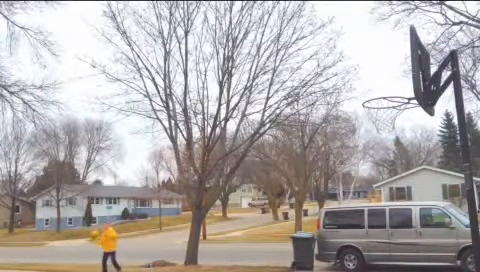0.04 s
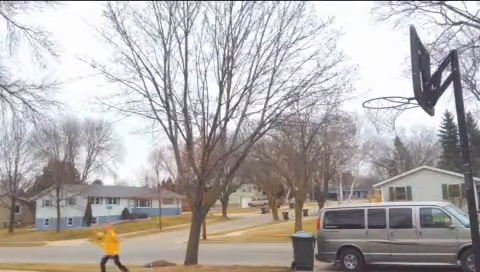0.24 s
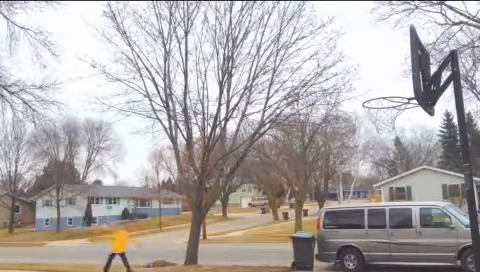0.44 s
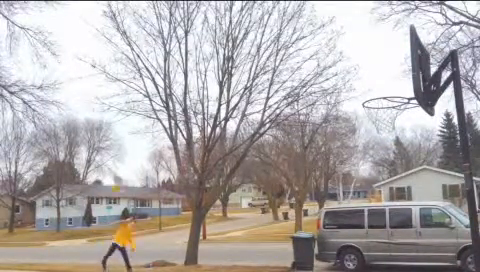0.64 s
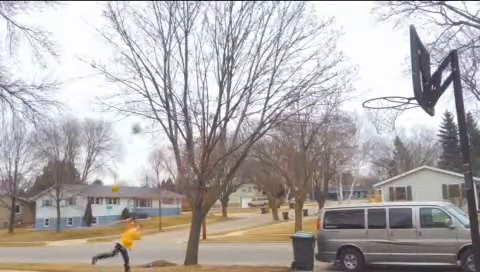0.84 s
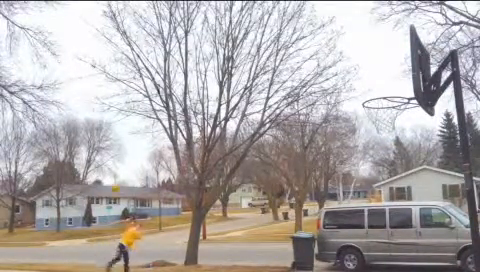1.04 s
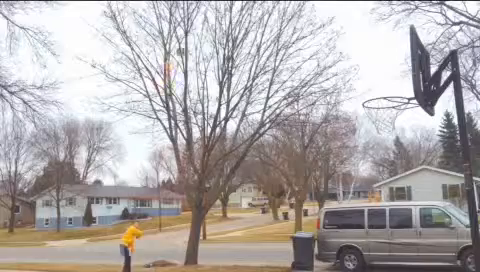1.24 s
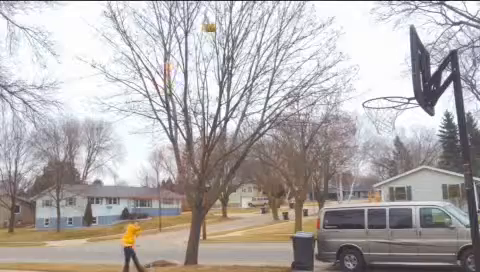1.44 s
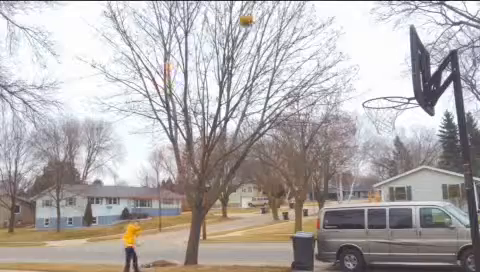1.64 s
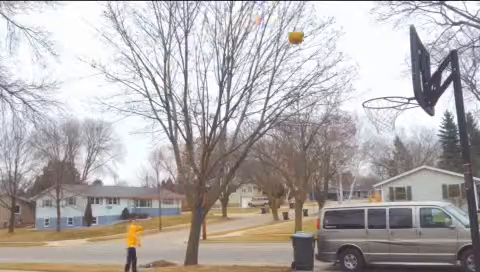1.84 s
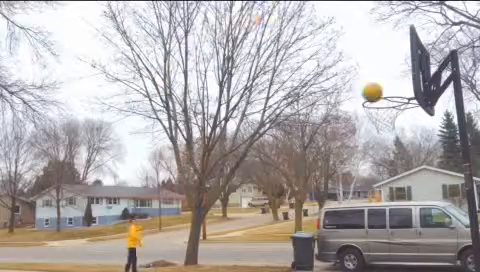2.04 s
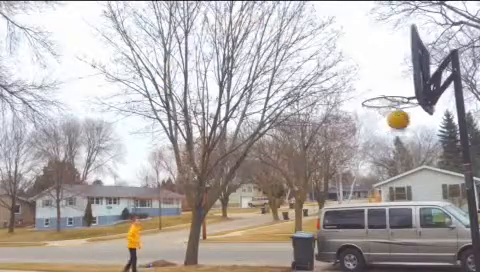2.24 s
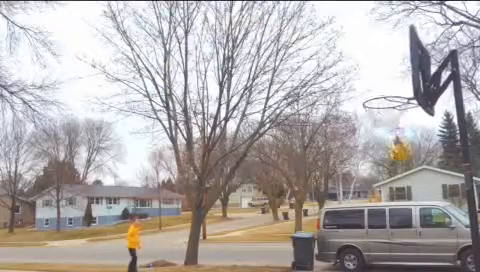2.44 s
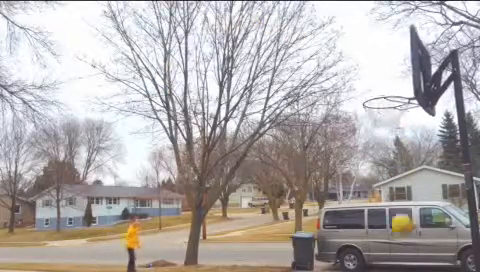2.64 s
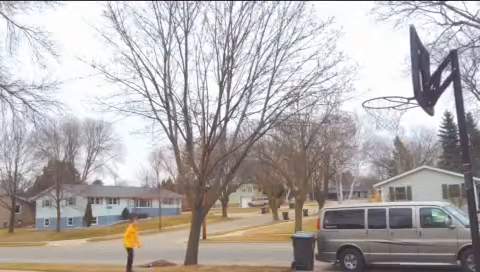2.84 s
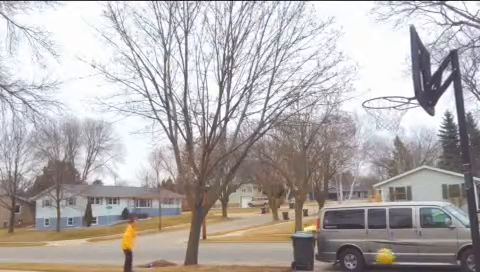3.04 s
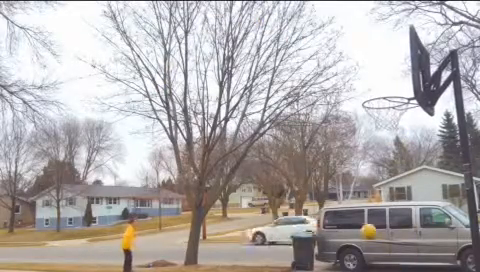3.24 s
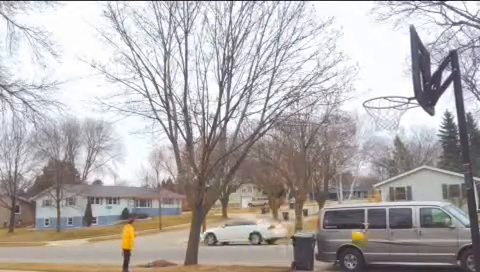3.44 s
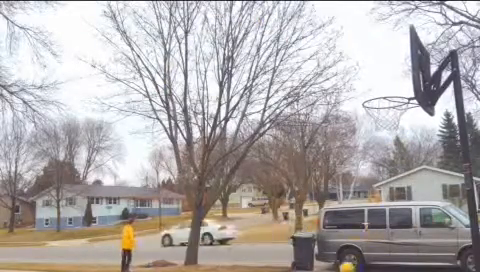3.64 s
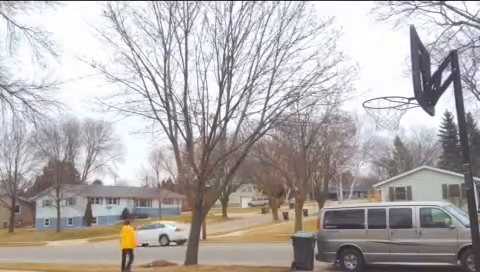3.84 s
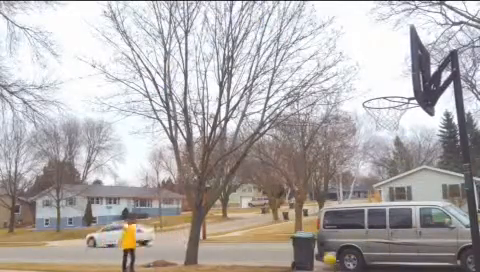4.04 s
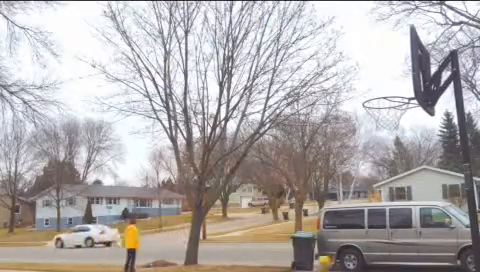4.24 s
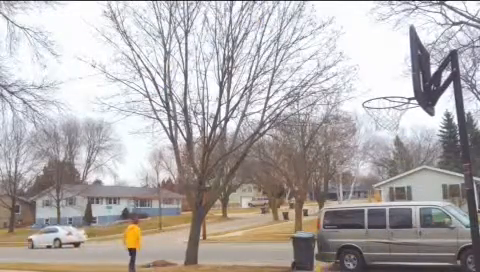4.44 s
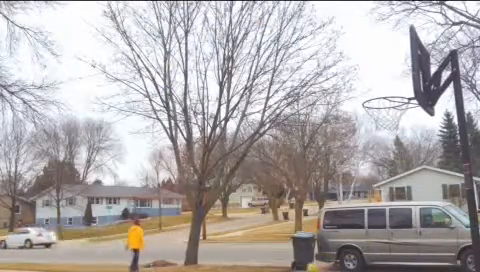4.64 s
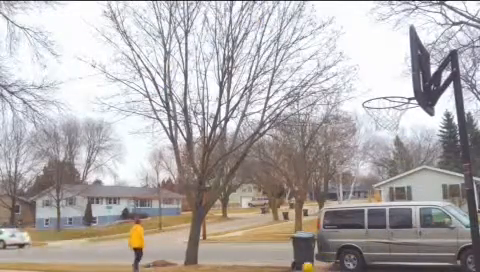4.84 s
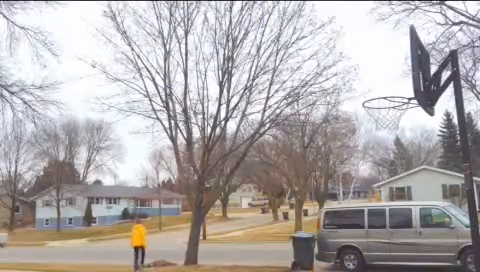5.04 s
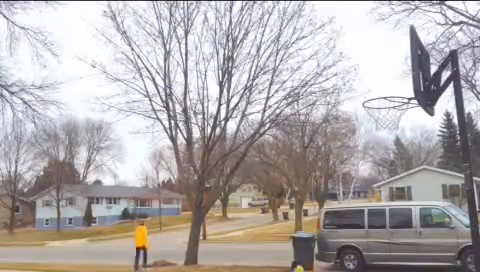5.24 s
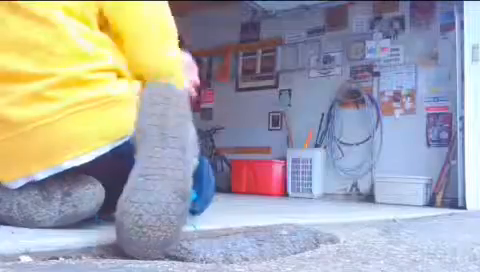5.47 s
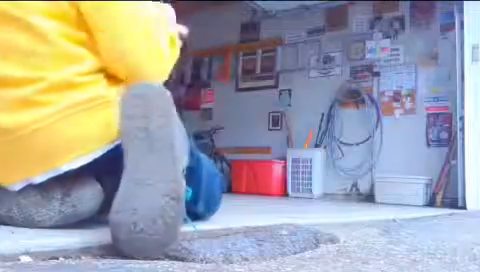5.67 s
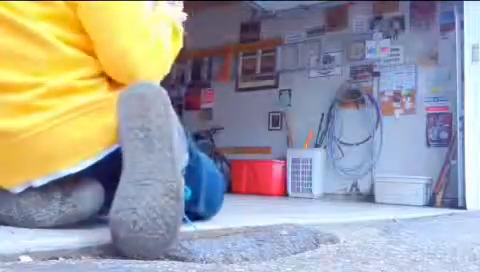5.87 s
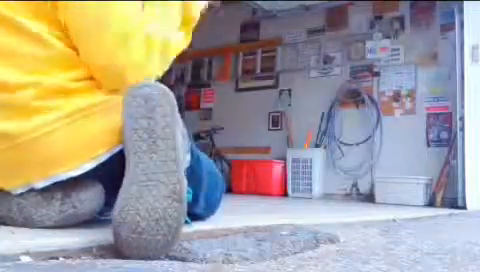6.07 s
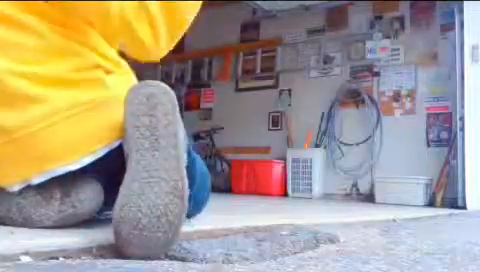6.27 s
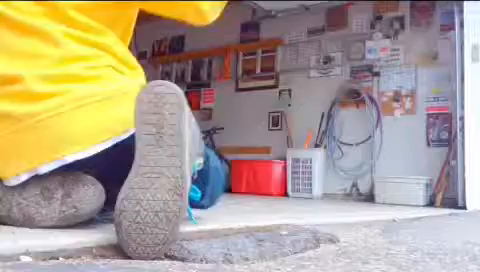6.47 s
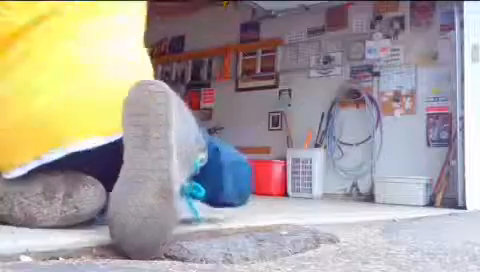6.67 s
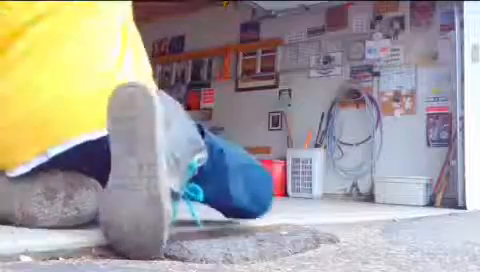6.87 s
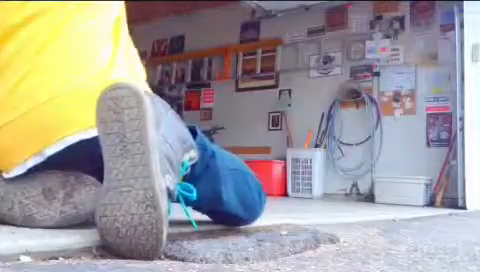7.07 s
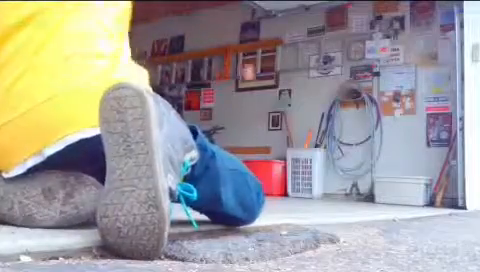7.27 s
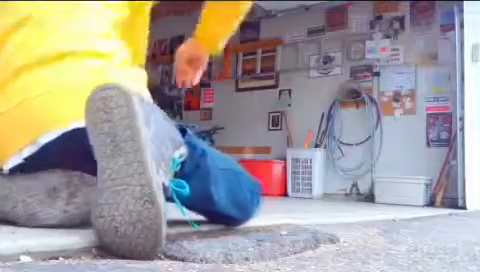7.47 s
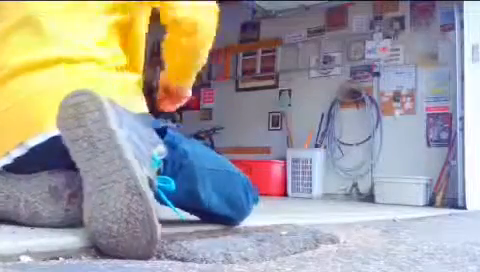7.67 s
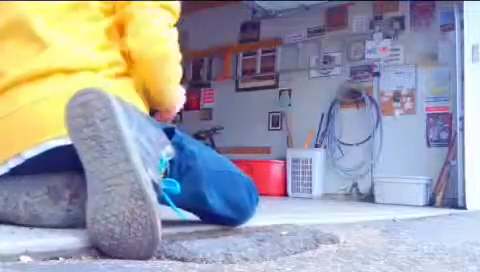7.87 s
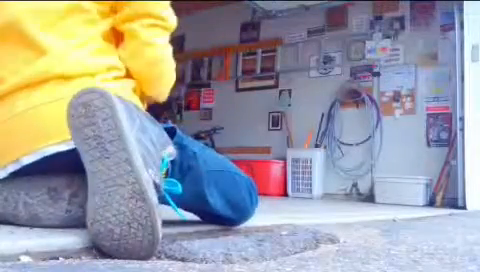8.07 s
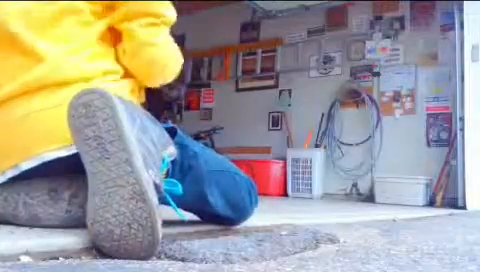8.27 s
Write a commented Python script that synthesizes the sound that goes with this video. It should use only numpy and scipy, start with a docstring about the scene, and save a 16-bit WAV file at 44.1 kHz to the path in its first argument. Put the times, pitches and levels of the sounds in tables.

```python
"""Tyres roar and hiss as a car passes, over a faint early thump and a bird chirp on the street. A basketball
whips through the net, tugs at the rim and bounces away: slap, grit and a ringing shell. Then the scene changes
to the quiet mouth of a garage: far hush, rustling clothes, birds, a soft low tone. A heavy blow, most likely
the ball on the overhead door, sets the panels booming and rattling. Shaped noise makes the rough sounds,
decaying modes the ringing ones, gliding tones the birds."""
import sys
import numpy as np
from scipy import signal
from scipy.fft import rfft, irfft
from scipy.io import wavfile
from scipy.ndimage import uniform_filter1d, minimum_filter1d

SR = 44100
rng = np.random.default_rng(int(sys.argv[2]) if len(sys.argv) > 2 else 0)


def transcribe(signal):
    """Save signal, clipped to [-1, 1], as a 16-bit WAV file at the path in sys.argv[1]."""
    frames = np.atleast_2d(signal).T
    limited = np.clip(frames, -1, 1)
    pcm = np.round(limited * 32767).astype(np.int16)
    wavfile.write(sys.argv[1], SR, pcm)


N = 366471
T = np.arange(N) / SR
GARAGE_START_S = 5.505

# Spectra give colour only, each player sets the loudness; table levels are before the players' trims.
# tyre roar: f/Hz, level/dB per Hz
ROAR_COLOUR = [(25, -58), (60, -34), (110, -16), (170, -2), (240, 1), (400, -2), (700, -1), (950, -0.5),
               (1250, -2), (1800, -1), (2500, -8), (3500, -18), (5000, -26), (9000, -59)]
# tyre hiss: f/Hz, level/dB per Hz
HISS_COLOUR = [(1200, -18), (2500, 9), (4000, 2), (5200, 1.5), (6800, 0), (8500, -4), (11000, -10),
               (15500, -15.5)]
# tyre noise swells where houses and the parked van leave the view open:
# t/s, half width/s, roar level/dB, hiss level/dB, tread level/dB, roar brightness/dB per octave
TYRE_SWELLS = [(.1, 0.16, -58, -74, -50, 1.5), (1.38, 0.34, -44, -60.5, -67, 0.5),
               (1.9, 0.25, -44.5, -62.5, -70, 2.5), (3.6, 0.32, -38.5, -62.5, -45.5, -0.94),
               (4.25, 0.48, -41.5, -60, -46.5, -1), (5.2, 0.61, -44.5, -64.5, -46.5, 0)]
# the street between swells (dB)
STREET_ROAR_DB, STREET_HISS_DB, STREET_TREAD_DB = -44, -68.5, -57.5
# the car is nearest at this time; it takes so long to cover its nearest distance, coming and going (s)
NEAREST_S, COMING_S, GOING_S = 2.12, 0.95, 1.37
# lowest pitch that the echo off the road weakens when the car is nearest (Hz)
NOTCH_HZ = 2466

# a faint early thump, then the ball's landings on the driveway: # t/s, slap level/dB, thump level/dB, grit
# level/dB, delay of the echo off the van/s
DRIVEWAY_HITS = [(.1147, -48, -24, -37, .06), (2.9832, 0, 0, -7.5, 0.052), (3.913, -11, -6, -7, 0.038),
                 (4.6174, -26, -11.5, -16, 0.04), (5.172, -34, -13, -20, .029)]
# slap of the ball: f/Hz, level/dB per Hz
SLAP_COLOUR = [(30, -45), (110, -24), (300, 4), (1000, 1), (2000, 9), (3300, -5), (4500, -6), (5700, 5),
               (7800, -4), (9500, 1), (13000, -9.5), (15500, -28)]
# crunching grit: f/Hz, level/dB per Hz
GRIT_COLOUR = [(100, -28), (3500, 3), (4800, 13.5), (6400, 10.5), (8000, -3), (9300, -2), (11000, -30),
               (13500, -5), (15500, -32)]
# the ball's shell, then the air inside it: f/Hz, level/dB, t60/s
BALL_MODES = [(196, -20.5, 0.054), (720, -23.5, 0.053), (964, -31.5, 0.11), (1080, -29, .04),
              (1817, -37.5, 0.08), (2230, -31, 0.056), (2930, -36, 0.037)]
# echoes off the ground and the house fronts: delay/s, level/dB
GROUND_ECHOES = [(.0062, -21), (0.0206, -24), (.063, -28), (.096, -27.5)]

# bird notes: t/s, length/s, first f/Hz, last f/Hz, warble depth/Hz, level/dB
BIRD_NOTES = [(0.133, 0.048, 3135, 3060, 0, -60), (5.78, .042, 4140, 3300, 350, -62),
              (5.817, 0.041, 3200, 2760, 200, -59.5), (5.999, .014, 5200, 7960, 0, -59),
              (8.242, .068, 2400, 3120, 0, -77.5)]
WARBLE_HZ = 50
# a far bird repeats one note: first note (s), spacing (s), level (dB)
FAR_START_S, FAR_GAP_S, FAR_DB = 5.96, .117, -82.5

# the ball drags the net taut and the cords whip about: t/s, tug level/dB, snap level/dB, t60/s
NET_MOVES = [(2.2025, -33.5, -36.5, 0.057), (2.2154, -26.5, -35, 0.084), (2.2214, -34, -23, 0.045),
             (2.2304, -31, -32.5, .13), (2.2787, -37, -35.5, 0.17), (2.4098, -43, -39.5, .066),
             (2.445, -47, -46, 0.11), (2.5353, -54, -54.5, 0.34), (2.6185, -55, -48, 0.095),
             (2.8151, -58, -58, 0.12)]
# tug of the net: f/Hz, level/dB per Hz
TUG_COLOUR = [(60, -41), (170, -33), (290, 5.5), (520, 4), (820, 1), (1200, -1), (1700, -9), (2800, -18.5),
              (6000, -29.5)]
# snap of the cords: f/Hz, level/dB per Hz
SNAP_COLOUR = [(500, -22), (2000, -1), (3500, -7), (5000, -3), (6700, 4), (8500, -3.5), (11500, -6.5),
               (15500, -14)]
# the rim under the tug: f/Hz, level/dB, t60/s
RIM_MODES = [(275, -12.5, 0.37), (402, -3.5, 0.066), (810, 2, 0.071), (1493, -11, 0.077),
             (3280, -18, 0.076), (4630, -13, .045), (6600, -12, 0.066)]
# the steel loops that hold the net clink with each snap: f/Hz, level/dB, t60/s
LOOP_MODES = [(4800, 0, 0.032), (5103, -19, 0.096), (6013, -11, 0.058), (8172, 0, 0.03), (8446, -5, 0.038)]

# hush of far traffic: f/Hz, level/dB per Hz
HUSH_COLOUR = [(25, -54), (60, -26), (100, -14.5), (150, -4), (210, -6.5), (265, -4.5), (330, -6),
               (600, -8), (820, -5.5), (1150, -12.5), (1700, -23.5), (2600, -32.5), (9000, -33.5),
               (15500, -35.5)]
HUSH_DB = -57.5
# rubbing cloth: f/Hz, level/dB per Hz
CLOTH_COLOUR = [(600, -26), (2000, -1.5), (4200, -11), (7000, -3), (9000, 0.5), (12000, -6), (15500, -12)]
# strokes of sleeve and trouser leg: t/s, time to fall by 8.7 dB either side/s, level/dB
CLOTH_STROKES = [(5.52, 0.4, -72), (5.765, 0.1, -64), (6.18, 0.1, -61), (6.335, 0.1, -66.5),
                 (6.78, .085, -60.5), (7.17, .08, -70.5), (7.6, .075, -54.5)]
RUSTLE_FLOOR_DB = -78.5  # clothes never rest entirely
# a soft low tone sinks in three pulses: t/s, length/s, first f/Hz, last f/Hz, level/dB
LOW_PULSES = [(7.118, .028, 305, 268, -50.5), (7.148, .045, 265, 245, -52.5), (7.196, .04, 240, 230, -56)]

# separate blows on the door: t/s, boom level/dB, knock level/dB, clatter level/dB, knock and clatter t60/s
DOOR_BLOWS = [(7.621, -46, -52, -32.5, 0.11), (7.6453, -29, -38.5, -27.5, 0.11),
              (7.663, -26, -9.5, -14, 0.026), (7.732, -29, -12, -41, 0.053), (7.8047, -32, -27, -39.5, .15),
              (7.8547, -55, -37.5, -40.5, 0.31), (7.9492, -55, -55, -49, 0.4), (8.166, -65, -50, -70, .071)]
# boom of the door: f/Hz, level/dB per Hz
BOOM_COLOUR = [(25, -48), (80, -28), (115, -16), (160, 1.5), (320, 2), (480, -0.5), (750, -11),
               (1100, -18.5), (1800, -23), (2800, -36), (6000, -42.5)]
# knock on the door: f/Hz, level/dB per Hz
KNOCK_COLOUR = [(100, -37), (400, -0.5), (750, 5), (1300, -2.5), (1800, -10), (2600, -16), (3300, -22),
                (5000, -26.5), (10000, -47)]
# crack and clatter of the steel: f/Hz, level/dB per Hz
STEEL_COLOUR = [(400, -18), (1500, 0), (2700, 0), (3400, 1), (4600, 1), (6000, -0.5), (8000, 6),
                (10500, -1), (15500, -13.5)]
# steel hinges and rollers: f/Hz, level/dB, t60/s
HINGE_MODES = [(3430, -9, 0.1), (4490, -2, .04), (4770, -11, 0.055), (7780, -6, .06), (9300, -15, .1)]
# the panels ring on after the main blow: f/Hz, level/dB, t60/s
PANEL_MODES = [(143.7, -12, 0.45), (193.7, 2.5, 0.53), (224, 0, 0.53), (254, 5, 0.48), (281.7, 6, 0.49),
               (312.4, 4.5, 0.4), (355.7, 4, 0.44), (404, -3.5, 0.46), (448, -3, 0.46), (478, -12, .5),
               (560, -2.5, 0.52), (608, -12, 0.32), (728, -17, 0.35), (820, -13, 0.47), (920, -13, .45),
               (957, -16, 0.37), (1770, -16, 0.37)]
MAIN_BLOW_S = 7.66  # the ball lands its full weight on the door
# from the main blow on, the door shudders in its tracks: spacing (s), knock and clatter of each blow (t60 s)
SHUDDER_GAP_S, SHUDDER_T60 = .02, .46
# boom, knock and clatter of the main blow and its rebounds, one row each: first level/dB, fall/dB per s
SHUDDER_LEVELS = [(-15, 102), (-28, 9), (-36, 152)]
# dull settling bumps: f/Hz, level/dB per Hz
BUMP_COLOUR = [(40, -40), (150, -11), (260, 2.5), (380, -6), (700, -11.5), (3000, -42)]
# the door settles: first bump (s), spacing (s), level (dB), fall (dB per s)
BUMP_START_S, BUMP_GAP_S, BUMP_DB, BUMP_FALL_DB_PER_S = 8.063, .02, -38.5, 84


def amp(db):
    """Turns dB into an amplitude factor."""
    return 10 ** (np.asarray(db) / 20)


def evened(x):
    """Scales to rms 1."""
    return x / np.sqrt(np.mean(x ** 2) + 1e-20)


def read(points, hz):
    """A spectrum's dB at the given frequencies, drawn straight over log frequency."""
    f, value = np.transpose(points)
    return np.interp(np.log(hz + 1), np.log(f + 1), value)


def add(mix, s, sound):
    """Mixes a sound in at time s."""
    part = mix[max(round(s * SR), 0):][:len(sound)]
    part += sound[:len(part)]


def beats(gap_s, count):
    """Evenly spaced delays, from zero."""
    return gap_s * np.arange(count)


def noise(spectrum, size=N, grain_db=0):
    """Coloured noise of rms 1; uneven grain sizes make it crackle."""
    grains = rng.standard_normal(size) * amp(grain_db * rng.standard_normal(size))
    gain = amp(read(spectrum, np.fft.rfftfreq(size, 1 / SR)))
    return evened(irfft(rfft(grains) * gain, size))


def fade(t60, rise=0.00056):
    """One second of a quick rise and an exponential decay."""
    return (1 - np.exp(-T[:SR] / rise)) * np.exp(-np.log(1000) * T[:SR] / t60)


def ring(modes, rise=0.00043):
    """One second of struck modes."""
    return sum(amp(db) * fade(t60, rise) * np.cos(2 * np.pi * hz * T[:SR]) for hz, db, t60 in modes)


def click(spectrum, size=2048):
    """The sharpest causal (minimum-phase) pulse with this spectrum, of energy 1."""
    log_gain = np.log(amp(read(spectrum, abs(np.fft.fftfreq(size, 1 / SR)))))
    pulse = np.fft.ifft(np.exp(np.conj(signal.hilbert(log_gain)))).real
    return pulse / np.linalg.norm(pulse)


def scatter(x, t60, rise):
    """Diffuse reflections from trees, ground and walls."""
    tail = rng.standard_normal(SR) * fade(t60, rise)
    return signal.fftconvolve(x, tail / np.linalg.norm(tail))[:N]


def whistle(length, first_hz, last_hz, db, warble=0):
    """A pure tone that glides, with a soft start and end."""
    t = np.arange(0, length, 1 / SR)
    hz = np.linspace(first_hz, last_hz, len(t)) - warble * np.cos(2 * np.pi * WARBLE_HZ * t)
    tone = np.sqrt(2) * np.sin(2 * np.pi * np.cumsum(hz) / SR)
    return amp(db) * tone * signal.windows.tukey(len(t), .5)


def distance(t):
    """The car's distance as a multiple of its nearest."""
    return np.hypot(1, (t - NEAREST_S) / np.where(t < NEAREST_S, COMING_S, GOING_S))


def tyre_levels(t):
    """Roar, hiss and tread (dB) and brightness (dB per octave): bell-shaped swells add to the steady street."""
    s, width, roar, hiss, tread_db, brightness = np.transpose(TYRE_SWELLS)
    bells = np.exp(-((t[:, None] - s) / width) ** 2)
    layers = ((STREET_ROAR_DB, roar), (STREET_HISS_DB, hiss), (STREET_TREAD_DB, tread_db))
    powers = [amp(base) ** 2 + bells @ amp(db) ** 2 for base, db in layers]
    # each swell tints the roar by its share of the power
    tilt = bells @ (brightness * amp(roar) ** 2) / powers[0]
    return *(10 * np.log10(powers)), tilt


def traffic(road_echo=0.56, echo_edge_hz=9000, patchy_db=1.5, roar_db=-0.45, hiss_db=2.0):
    """Tyre roar and hiss, combed by an echo off the road whose delay changes as the car moves."""
    hz, t, z = signal.stft(rng.standard_normal(N), SR, nperseg=1024, noverlap=768)
    roar, hiss, _, brightness = tyre_levels(t)
    notch = NOTCH_HZ * distance(t)
    echo = road_echo / (1 + (hz[:, None] / echo_edge_hz) ** 2)  # rough asphalt scatters the treble
    comb = abs(1 + echo * np.exp(-1j * np.pi * hz[:, None] / notch))
    octaves = np.log2(np.maximum(hz, 200))[:, None]  # brightness tilts only above 200 Hz
    power = 0
    for spectrum, level, tilt in ((ROAR_COLOUR, roar + roar_db, brightness), (HISS_COLOUR, hiss + hiss_db, 0)):
        shape = (amp(read(spectrum, hz)[:, None] + tilt * octaves) * comb) ** 2
        power = power + shape / shape.mean(0) * amp(level) ** 2
    # the level wanders in patches of pitch and time
    patches = uniform_filter1d(rng.standard_normal(z.shape), size=10, axis=0)
    patches = evened(uniform_filter1d(patches, size=6, axis=1))
    shaped = z * np.sqrt(power) * amp(patchy_db * patches)
    return signal.istft(shaped, nperseg=1024, noverlap=768)[1][:N]


def tread(centre_hz=945, width_hz=110, tread_db=-2):
    """Air in the tyre grooves resonates: noise in one narrow peak."""
    hz = np.fft.rfftfreq(N, 1 / SR)
    peak = 1 / (1 + ((hz - centre_hz) / width_hz) ** 2) ** 2
    hum = evened(irfft(rfft(rng.standard_normal(N)) * peak, N))
    return hum * amp(tyre_levels(T)[2] + tread_db)


def bounces(crunch_db=-19, crunch_t60=0.019, van_db=-19, wet_db=-19):
    """Each landing, and the faint early thump, slaps the air, crunches grit and sets the ball ringing."""
    direct, body, echoes = np.zeros((3, N))
    for s, slap, thump, grit, van_s in DRIVEWAY_HITS:
        hit = amp(grit + crunch_db) * noise(GRIT_COLOUR, size=SR, grain_db=4) * fade(crunch_t60)
        add(hit, 0, -amp(slap) * click(SLAP_COLOUR) - amp(grit) * click(GRIT_COLOUR))
        add(direct, s, hit)
        add(body, s, amp(thump) * ring(BALL_MODES, rise=0.0011))
        add(echoes, s + van_s, amp(van_db) * hit)
        for delay, db in GROUND_ECHOES:
            add(echoes, s + delay, amp(db) * hit)
    blurred_echoes = scatter(echoes, t60=.05, rise=.0004)
    return direct + body + blurred_echoes + amp(wet_db) * scatter(direct, t60=0.48, rise=0.023)


def birds(far_hz=4450, note_s=.04, waver_hz=50, uneven_db=2, wet_db=-6):
    """Small birds in the trees: gliding, warbling pure tones, with the street's echo."""
    out = np.zeros(N)
    for s, length, first_hz, last_hz, warble, db in BIRD_NOTES:
        add(out, s, whistle(length, first_hz, last_hz, db, warble))
    for late in beats(FAR_GAP_S, count=10):
        first, last, strength = rng.standard_normal(3)
        first_hz, last_hz = far_hz + waver_hz * first, far_hz + waver_hz * last
        add(out, FAR_START_S + late, whistle(note_s, first_hz, last_hz, FAR_DB + uneven_db * strength))
    return out + amp(wet_db) * scatter(out, t60=0.31, rise=0.0075)


def net(rim_db=-2, loop_db=-10, wet_db=-13):
    """Cords snap against the ball and tug at the rim, and the steel loops clink."""
    out = np.zeros(N)
    for s, tug, snap, t60 in NET_MOVES:
        pull = noise(TUG_COLOUR, size=SR) * fade(t60, rise=0.002)
        add(out, s, amp(tug) * (pull + amp(rim_db) * ring(RIM_MODES)))
        add(out, s, amp(snap + loop_db) * ring(LOOP_MODES))
        add(out, s, amp(snap) * noise(SNAP_COLOUR, size=SR, grain_db=7.0) * fade(t60, rise=0.00063))
    return out + amp(wet_db) * scatter(out, t60=0.51, rise=0.029)


def hush():
    """Far traffic blurs into a steady coloured noise."""
    return amp(HUSH_DB) * noise(HUSH_COLOUR)


def rustle():
    """Cloth rubs on cloth: crackling noise that swells with each movement."""
    strokes = sum((amp(db) * np.exp(-abs(T - s) / width)) ** 2 for s, width, db in CLOTH_STROKES)
    return np.sqrt(amp(RUSTLE_FLOOR_DB) ** 2 + strokes) * noise(CLOTH_COLOUR, grain_db=6.0)


def low_tone():
    """A soft low tone sinks in short gliding pulses."""
    out = np.zeros(N)
    for s, *note in LOW_PULSES:
        add(out, s, whistle(*note))
    return out


def shudder():
    """The main blow and the rebounds that follow it, ever weaker, as rows like those of DOOR_BLOWS."""
    rows = []
    for late in beats(SHUDDER_GAP_S, count=7):
        levels = (db - fall * late for db, fall in SHUDDER_LEVELS)
        rows.append((MAIN_BLOW_S + late, *levels, SHUDDER_T60))
    return rows


def panels(panel_db=-20, swell_s=0.0098):
    """The door panels ring on in decaying modes; the ring builds as waves cross them."""
    out = np.zeros(N)
    for hz, db, t60 in PANEL_MODES:
        mode = np.sin(2 * np.pi * (hz * T[:SR] + rng.random()))
        add(out, MAIN_BLOW_S, amp(panel_db + db) * fade(t60, swell_s) * mode)
    return out


def settling():
    """Dull bumps of low noise, each weaker than the last, as the door settles."""
    out = np.zeros(N)
    for late in beats(BUMP_GAP_S, count=4):
        bump = noise(BUMP_COLOUR, size=SR) * fade(t60=0.11, rise=0.0024)
        add(out, BUMP_START_S + late, amp(BUMP_DB - BUMP_FALL_DB_PER_S * late) * bump)
    return out


def door(body_db=-1.0, body_t60=0.49, crack_db=14, wet_db=-14):
    """Each blow cracks, booms, knocks and makes the hinges clatter, over ringing panels and settling bumps."""
    out = panels() + settling()
    hinges, crack = ring(HINGE_MODES), amp(crack_db) * click(STEEL_COLOUR)
    for s, boom, knock, clatter, t60 in DOOR_BLOWS + shudder():
        add(out, s, amp(clatter) * crack)
        add(out, s, amp(boom + body_db) * noise(BOOM_COLOUR, size=SR) * fade(body_t60, rise=0.0024))
        steel = noise(STEEL_COLOUR, size=SR, grain_db=2.0) + hinges
        strike = amp(knock) * noise(KNOCK_COLOUR, size=SR) + amp(clatter) * steel
        add(out, s, strike * fade(t60, rise=0.00022))
    return out + amp(wet_db) * scatter(out, t60=0.46, rise=0.011)


def scene():
    """The street gives way abruptly to the garage; birds run through both."""
    street_gain = np.clip((GARAGE_START_S - T) / .006 + .5, 0, 1)  # 6 ms crossfade
    street = traffic() + tread() + bounces() + net()
    garage = hush() + rustle() + low_tone() + door()
    return (street_gain * street + (1 - street_gain) * garage + birds())[None]


def record(dry, low_cut_hz=52, high_cut_hz=15400):
    """The microphone drops the lowest bass, a fast limiter holds the peaks; then the band limit."""
    ceiling_db, recovery_db = -4.8, 1500  # recovery in dB per second
    x = signal.sosfilt(signal.butter(2, low_cut_hz, "high", fs=SR, output="sos"), dry[0])
    peak_db = 20 * np.log10(-minimum_filter1d(-abs(x), size=16) + 1e-9)
    fall = T * recovery_db
    # follow peaks at once, then let go at the recovery rate
    envelope_db = np.maximum.accumulate(peak_db + fall) - fall
    over_db = np.maximum(envelope_db - ceiling_db, 0)
    held = x / amp(uniform_filter1d(over_db, size=16))
    band = signal.firwin(401, high_cut_hz, window=("kaiser", 8), fs=SR)
    return signal.oaconvolve(held, band, "same")[None]


dry = scene()
out = record(dry)
transcribe(out)
```